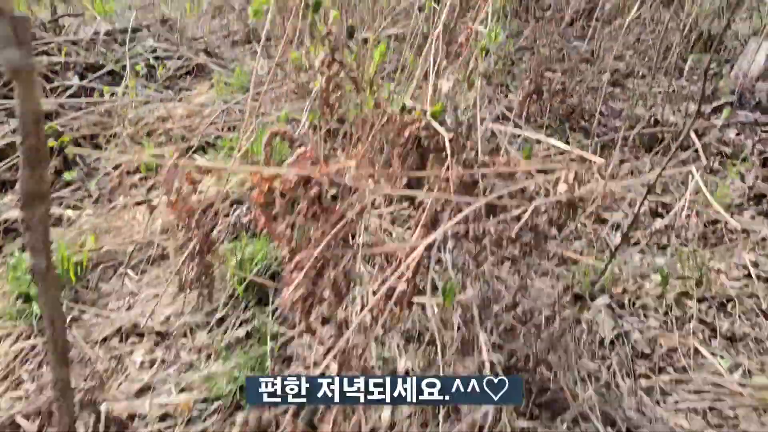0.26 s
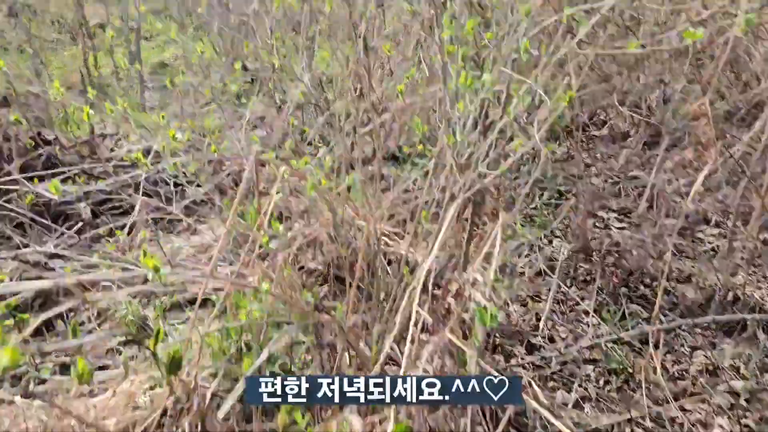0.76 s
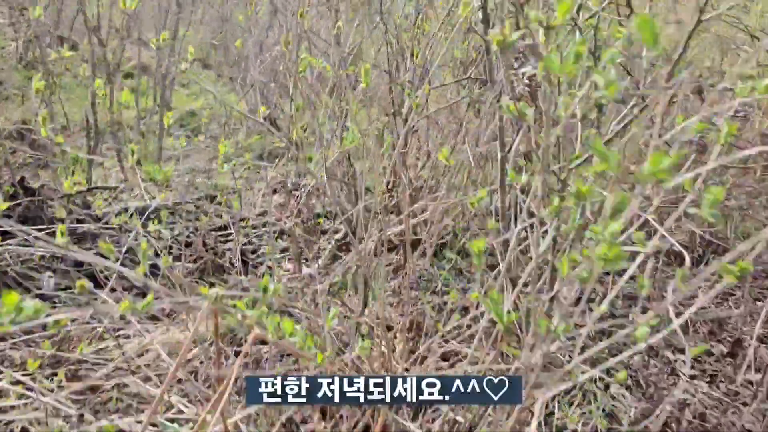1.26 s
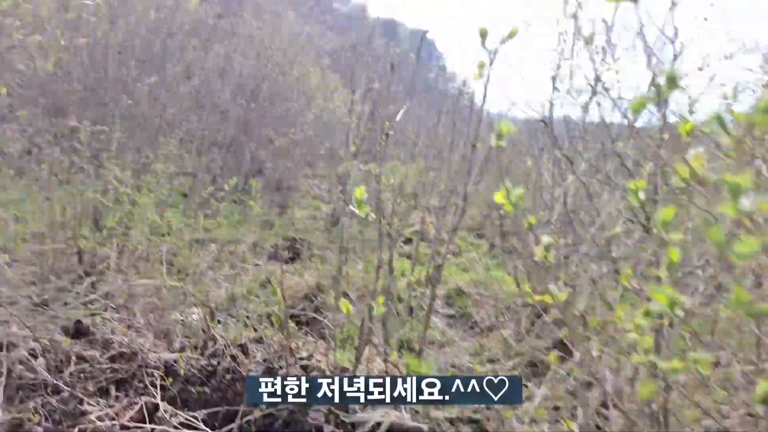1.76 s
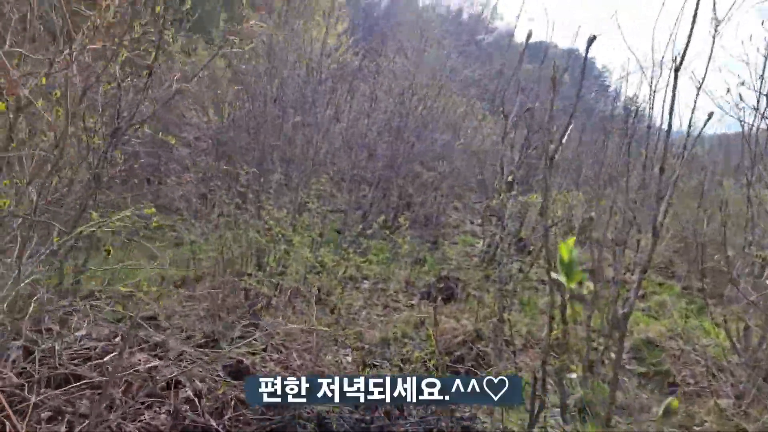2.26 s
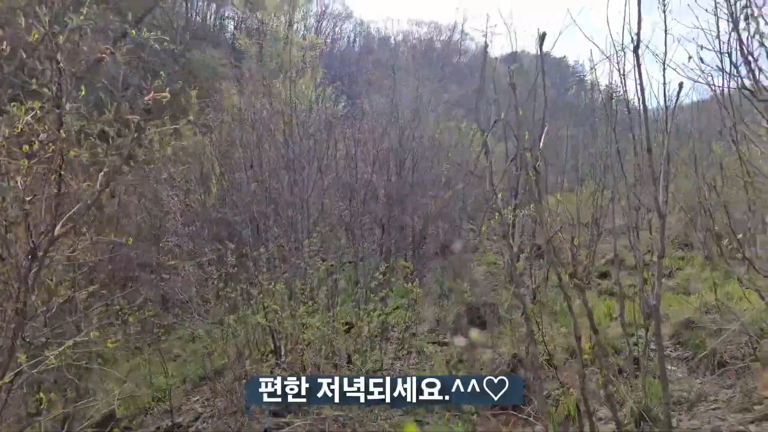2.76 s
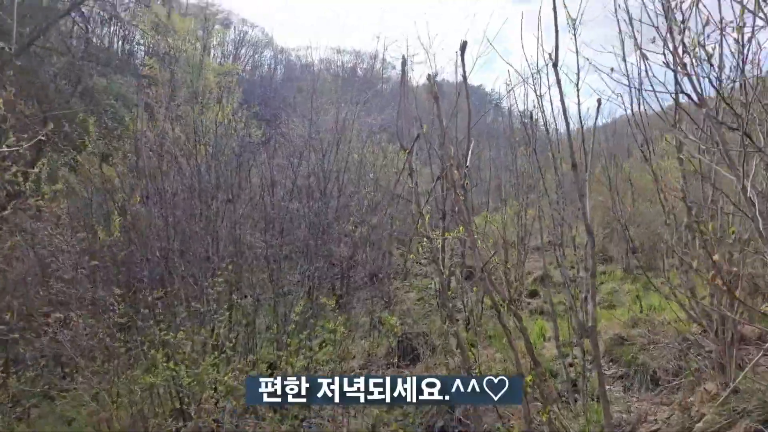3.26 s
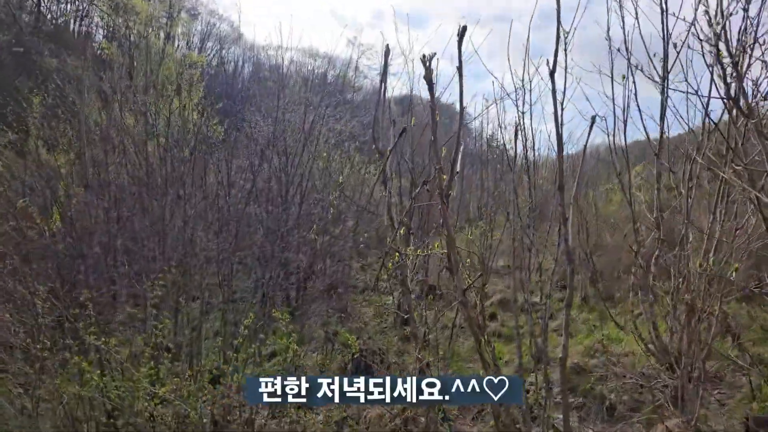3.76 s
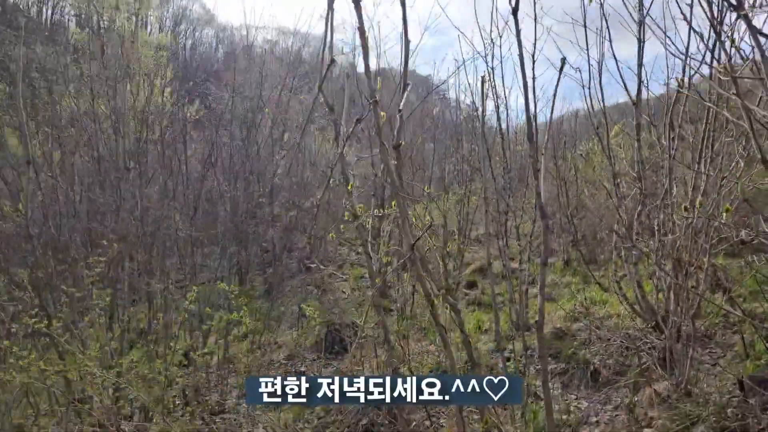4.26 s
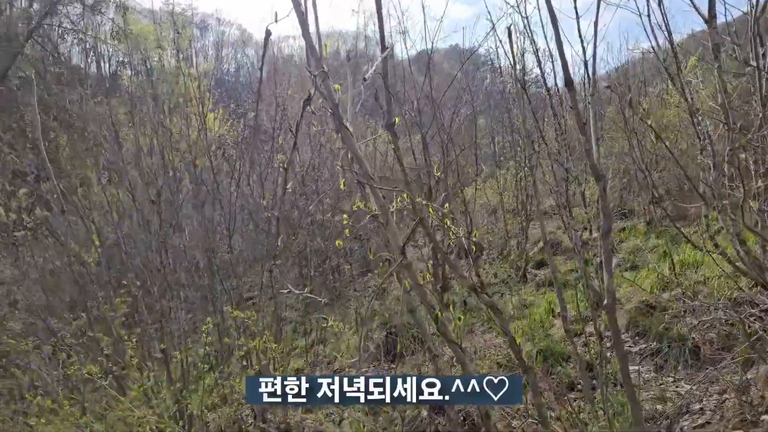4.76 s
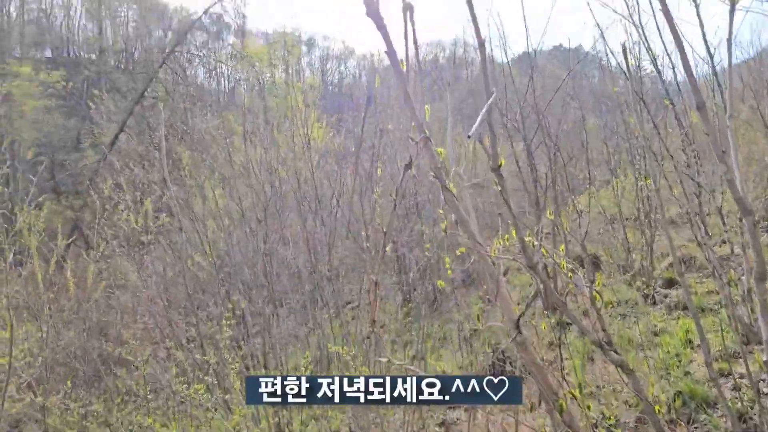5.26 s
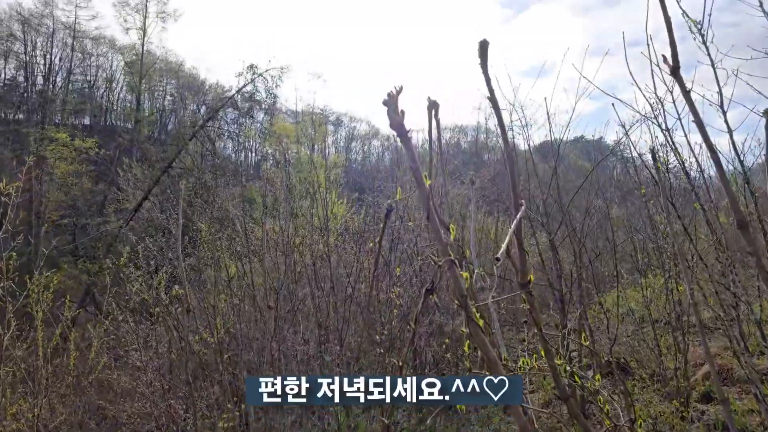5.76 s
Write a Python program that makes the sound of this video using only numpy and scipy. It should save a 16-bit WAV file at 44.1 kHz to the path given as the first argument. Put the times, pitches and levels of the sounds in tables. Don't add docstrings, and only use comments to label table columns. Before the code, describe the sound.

Brittle leaves crackle from the start over faint outdoor hiss and low wind. Twigs crack, stems rasp on cloth, and a branch raps a pole just after two seconds. A small distant bird whistles downward around three, then the loudest brush breaking comes near four and a half. It thins, then crackles again at the end. Close, dry, wide stereo, with no room echo.

```python
import sys
import numpy as np
from scipy import signal
from scipy.fft import rfft, irfft, next_fast_len
from scipy.io import wavfile
from scipy.ndimage import uniform_filter1d

SR = 44100
rng = np.random.default_rng(int(sys.argv[2]) if len(sys.argv) > 2 else 0)


def nominal_scale(level):
    x = np.asarray(level, float) / 20
    return 10 ** x


def pcm_store(signal):
    levels = np.round(np.clip(np.atleast_2d(signal), -1, 1) * 32767)
    wavfile.write(sys.argv[1], SR, levels.astype(np.int16).T)


N = 265041


def evened(x):
    return x / np.sqrt(np.mean(x ** 2) + 1e-20)


def read(points, hz):
    f, value = np.transpose(points)
    return np.interp(np.log(hz + 1), np.log(f + 1), value)


def curves(rows):
    s, *columns = np.transpose(rows)
    return [np.interp(np.arange(N) / SR, s, c) for c in columns]


def colour(x, db_at):
    size = next_fast_len(x.shape[-1] + 512)
    gain = nominal_scale(db_at(np.fft.rfftfreq(size, 1 / SR)))
    return irfft(rfft(x, size) * gain, size)[..., :x.shape[-1]]


def above(hz, edge_hz):
    return -10 * np.log10(1 + (edge_hz / (hz + 1e-3)) ** 4)


def sides(db):
    return nominal_scale(np.array([db / 2, -db / 2]))


def add(mix, s, sound):
    part = mix[:, round(s * SR):][:, :sound.shape[1]]
    part += sound[:, :part.shape[1]]


def crackle(per_s, spread_db, grain_ms, bed, clump_db, clump_ms):
    clump_size = int(clump_ms * SR / 1000)
    clumps = uniform_filter1d(rng.standard_normal(N), clump_size)
    clumps = evened(uniform_filter1d(clumps, clump_size))
    sizes = nominal_scale(spread_db * np.minimum(rng.exponential(1, N), 2.3))
    sizes = sizes * (rng.random(N) < per_s / SR)
    bursts = signal.lfilter([1], [1, -np.exp(-1000 / (grain_ms * SR))], sizes ** 2)
    return evened(np.sqrt(bed + bursts / bursts.mean()) * nominal_scale(clump_db * clumps))


def patchy(x, patchy_db, hz_wide, ms_long):
    z = signal.stft(x, nperseg=256, noverlap=128)[2]
    field = rng.standard_normal(z.shape[1:])
    field = uniform_filter1d(field, int(hz_wide * 256 / SR) + 1, 0)
    field = uniform_filter1d(field, int(ms_long * SR / (128 * 1000)) + 1, 1)
    return signal.istft(z * nominal_scale(patchy_db * evened(field)), nperseg=256, noverlap=128)[1][:, :N]


def strokes(bed_db, start, length, db, rise_s, fade_db):
    power = nominal_scale(bed_db) ** 2
    for s, long, peak_db in zip(start, length, db):
        t = np.arange(0, 2 * max(long, .01), 1 / SR)
        stroke = np.minimum(t / rise_s, 1) * nominal_scale(peak_db + fade_db * (t / long) ** 2)
        add(power[None], s, stroke[None] ** 2)
    return 10 * np.log10(power)


# frequency in Hz, level in dB per Hz.
AIR_COLOUR = [(24, -56), (40, -78), (252, -2), (2970, 18), (6330, 1), (10800, -11), (12200, -4),
              (15300, 10), (16500, -22)]
AIR_DB = -63


def air():
    one, two, three = rng.standard_normal((3, N))
    far = colour(one, lambda hz: read(AIR_COLOUR, hz) + above(1350, hz) + 3 * above(hz, 230) + 7)
    hiss = colour(np.array([two, three]), lambda hz: read(AIR_COLOUR, hz) + 2 * above(hz, 330))
    return nominal_scale(AIR_DB) * evened(far + hiss)


# time of the peak in seconds, level in dB, seconds to fall by 20 dB either side.
GUSTS = [(.13, -62.5, 0.4), (.6, -53, 0.28), (1.1, -55.5, 0.14), (1.22, -57, 0.15), (2.05, -63.5, .21),
         (2.5, -62, 0.03), (2.65, -60.5, 0.2), (2.82, -60.5, 0.14), (3.48, -64, 0.2), (4.48, -55, 0.03),
         (4.65, -49, 0.03), (4.79, -40.5, 0.08), (5.08, -66, 0)]
CALM_DB = -95


def wind():
    t = np.arange(0, N, 64) / SR
    puffs = nominal_scale(CALM_DB) ** 2 + sum(nominal_scale(db - 20 * abs(t - s) / fall_s) ** 2 for s, db, fall_s in GUSTS)
    wind_db = curves(np.c_[t, 10 * np.log10(puffs)])[0]
    rumble = colour(rng.standard_normal((2, N)), lambda hz: 2 * above(hz, 29.5) + 2 * above(102, hz))
    return sides(1.7)[:, None] * nominal_scale(wind_db + 3.5) * evened(rumble)


# time in seconds, effort in dB, coarse leaves and stems over fine ones in dB.
PUSH = [(0, -49, -11), (.3, -48, -9), (.5, -42, -6), (.72, -42, -7.5), (.95, -52.5, -8), (1.6, -45.5, -10),
        (1.72, -37.5, -13), (2.3, -37, -12), (2.43, -38.5, -13.5), (2.93, -43.5, -13), (3.4, -35, -13),
        (3.9, -34.5, -17), (4.27, -40.5, -13), (4.6, -32, -13), (4.9, -37, -12), (5.2, -45, -9.5),
        (5.64, -53.5, -8.5), (6.01, -36.5, -7)]
# start in seconds, length in seconds, level in dB, coarse over fine in dB.
CRUSHES = [(0.103, 0.057, -39, -8.5), (0.267, 0.042, -42.5, 0.5), (0.378, .075, -36, -6.5),
           (0.599, .1, -49, -6), (0.784, 0.079, -42.5, -12.5), (1.051, .1, -40.5, -9.5),
           (1.268, 0.068, -36, -13.5), (1.308, .07, -33.5, -14.5), (1.401, 0.09, -36.5, -8.5),
           (2.199, .045, -37.5, -5), (2.484, 0.11, -30.5, -17), (2.621, 0.21, -37, -9),
           (3.01, 0.069, -36, -18), (3.37, 0.12, -38.5, -4), (4.001, 0.033, -45, -14),
           (4.594, 0.046, -28, -9.5), (4.727, 0.14, -38.5, -3), (4.897, 0.046, -34.5, -8),
           (5.115, 0.056, -48.5, -2), (5.354, 0.14, -45, -7.5), (5.481, 0.045, -42, -7),
           (5.528, 0.061, -38, -4), (5.873, .1, -39, -12)]
CRUSH_RISE_S, CRUSH_FADE_DB = .018, -11.5


def leaf_levels():
    push_db, coarse_db = curves(PUSH)
    s, long, db, over_db = np.transpose(CRUSHES)
    hiss_db = strokes(push_db, s, long, db, CRUSH_RISE_S, CRUSH_FADE_DB)
    scrape_db = strokes(push_db + coarse_db, s, long, db + over_db, CRUSH_RISE_S, CRUSH_FADE_DB)
    return hiss_db, scrape_db


# frequency in Hz, level in dB per Hz.
LEAF_COLOUR = [(410, -35.5), (700, -27.0), (1460, -21.0), (1730, -18.5), (2580, -15.5), (3300, -11),
               (6150, -7.0), (8720, -9.5), (10900, -10.0), (12500, -6.5), (15400, -12.0), (20000, -4)]
# time in seconds, left over right in dB.
SIDE_OF_PATH = [(0.0, -6.5), (0.27, 1), (0.37, -1.5), (1.25, -3), (2.11, 2), (3.43, -0.5), (3.63, 2.5),
                (5.64, -0.5), (6.01, 0)]


def leaves():
    hiss_db, scrape_db = leaf_levels()
    side_db, = curves(SIDE_OF_PATH)
    both = crackle(per_s=900, spread_db=4.6, grain_ms=.35, bed=1.4, clump_db=1.2, clump_ms=14)
    own = crackle(per_s=300, spread_db=3.5, grain_ms=.8, bed=2, clump_db=.8, clump_ms=15)
    coarseness_db = scrape_db - hiss_db + 11
    both = both ** np.clip(1 + .06 * coarseness_db, .5, 1.3)
    one, two, three, four = rng.standard_normal((4, N))
    fine = patchy(both * np.array([one, two]), patchy_db=1.2, hz_wide=1200, ms_long=30)
    pair = np.array([three, 0.17 * three + 0.96 * four])
    coarse = patchy(both * own * pair, patchy_db=1.8, hz_wide=350, ms_long=40)
    fine = evened(colour(fine, lambda hz: read(LEAF_COLOUR, hz) + above(hz, 5500)))
    top = colour(fine, lambda hz: 2 * above(hz, 9500))
    fine = top + nominal_scale(.35 * coarseness_db) * (fine - top)
    coarse = evened(colour(coarse, lambda hz: read(LEAF_COLOUR, hz) + above(3060, hz)))
    return sides(side_db - 0.5) * (nominal_scale(hiss_db + 3.5) * fine + nominal_scale(scrape_db + 4.5) * coarse)


# start in seconds, length in seconds, level in dB.
TREADS = [(0.27, 0.068, -53), (0.372, 0.075, -47), (0.463, 0.57, -49), (0.697, 0.067, -42.5),
          (1.053, 0.06, -49.5), (1.247, 0.21, -54.5), (2.21, 0.2, -62), (2.5, 0.36, -55.5),
          (2.67, 0.1, -51), (3.308, 0.36, -51), (4.421, 0.12, -53.5), (4.563, 0.3, -56),
          (4.732, 0.069, -50), (5.03, 0.18, -57), (5.822, 0.33, -66)]
TREAD_RISE_S, TREAD_FADE_DB = 0.026, -8.5
GROUND_DB, GROUND_FOLLOWS = -60, 0.35
# frequency in Hz, level in dB per Hz.
HAND_COLOUR = [(41, -48), (70, -29), (107, -12), (190, 0), (237, 0), (335, -0.5), (800, -7.5), (1500, -14),
               (1950, -27.5), (3300, -120)]


def crunch():
    ground_db = GROUND_DB + GROUND_FOLLOWS * (curves(PUSH)[0] + 40)
    crunch_db = strokes(ground_db, *np.transpose(TREADS), TREAD_RISE_S, TREAD_FADE_DB)
    one, two = rng.standard_normal((2, N))
    lumps = crackle(per_s=120, spread_db=3, grain_ms=5, bed=.7, clump_db=2.2, clump_ms=25)
    pair = lumps * np.array([one + 0.35 * two, one - 0.22 * two])
    return nominal_scale(crunch_db + 0.5) * evened(colour(pair, lambda hz: read(HAND_COLOUR, hz)))


# start in seconds, peak in dB, thickness as the share under 4 kHz in dB,
# left over right in dB.
SNAPS = [(.0807, -25, -7.5, 4.5), (.1165, -17, -21, 5), (.1486, -20.5, -19, 3), (.174, -22, -11.5, 19),
         (.27, -21, -18, -1), (.417, -11, -15, 0), (.8762, -24.5, -7.5, -3), (1.0664, -27, -18, 15),
         (1.1394, -25, -14, -3.5), (1.2735, -27, -21, -6), (1.4616, -20, -17, -5.5), (1.5098, -25, -4, 1),
         (1.937, -20.5, -18, 15.5), (1.9806, -9, -17, 14.5), (2.0628, -8.5, -19, 8), (2.252, -25, -18, 7.5),
         (2.2956, -17, -18, 2), (2.689, -15.5, -10.5, -1), (2.828, -23, -10, 14), (3.105, -29, -20, 8),
         (3.1842, -30, -20, 12), (3.615, -30, -20, 10), (4.4687, -6, -24, 8), (4.6023, -7, -22.5, 8),
         (4.723, -14, -20, 1), (4.7622, -15.5, -19, 5), (5.2598, -18.5, -16.5, -1),
         (5.3555, -15.5, -24.5, 4), (5.562, -16.5, -17, 1), (5.9441, -18, -22, 8)]
# start in seconds, peak in dB, left over right in dB.
TICKS = [(.0331, -22, 3), (0.4334, -13, 1), (0.5424, -14, 2), (0.5947, -23, -3.5), (.6724, -11, -3.5),
         (.776, -25, -2), (.802, -14, 1), (1.2877, -19.5, -1), (1.4293, -12, 0), (1.6917, -29, 9),
         (2.1021, -22.5, 11), (2.2037, -14, 7), (2.485, -16.5, 10), (2.5076, -12.5, 8), (2.525, -16, 17),
         (2.603, -13, 11), (3.019, -26, 18), (3.861, -16, 7), (3.8693, -16.5, 7.5), (2.2288, -19, 9),
         (2.192, -20, 4.5), (2.8127, -19, 7), (3.129, -25, 7), (3.2388, -24, 7), (3.3525, -21, 6),
         (3.7818, -20.5, 8), (4.2561, -26, 4), (4.4418, -11.5, -0.5), (4.4995, -14, 8), (4.5537, -20, 8),
         (4.5677, -20.5, 12), (4.5835, -28, 10), (4.657, -20.5, 14), (4.9093, -18, 7), (4.9296, -10.5, 6),
         (5.4895, -11, 2.5), (5.851, -20, 0), (5.879, -19, 2), (5.895, -6.5, 9.5), (5.922, -14.5, 3)]
# start in seconds, peak in dB before a common
# lift, left over right in dB.
MORE_TICKS = [(0.387, -27, -0.5), (0.631, -31, -1.0), (0.833, -31, -3), (0.991, -35, 0.0), (1.336, -27, 0),
              (1.4135, -22.5, 0), (1.4518, -29, -2.0), (1.539, -31, -4), (1.5769, -36.5, -1.0),
              (1.7718, -27, -2), (1.9144, -27, 5), (2.26, -31, 2.0), (2.5286, -21.5, 4),
              (2.5654, -28.5, 0.5), (2.9791, -31.5, 2), (3.6686, -27, 6), (3.984, -28.5, 3),
              (4.7096, -20.5, -1), (4.7913, -23.5, 4), (4.8274, -22, 5), (4.8534, -28, 3.0),
              (4.8868, -26, 3), (4.973, -26, 5), (5.033, -34, 4), (5.1696, -34, 3), (5.3177, -41, 3),
              (5.4294, -32, 1), (5.5078, -32, 1.0), (5.5433, -34, 3), (5.6825, -36, 7), (5.7443, -34.5, 3.5),
              (5.7692, -30, 2.0)]
TICK_THICK_DB, MORE_TICKS_LIFT_DB = -30, 5.5
BUILD_S, BUILD_PER_S, CRACK_PER_S, REBOUND, LINGER = .0012, 1900, 1100, .22, .08


def snaps():
    out, t = np.zeros((2, N)), np.arange(1400) / SR
    breaks = SNAPS + [(s, db, TICK_THICK_DB, side_db) for s, db, side_db in TICKS]
    breaks += [(s, db + MORE_TICKS_LIFT_DB, TICK_THICK_DB, side_db) for s, db, side_db in MORE_TICKS]
    noise = rng.standard_normal((len(breaks), 3, len(t)))
    later = rng.uniform(0.0029, 0.0038, (len(breaks), 1))
    for (s, db, thick_db, side_db), (a, b, c), lag in zip(breaks, noise, later):
        shape = np.exp(np.minimum((t - BUILD_S) * BUILD_PER_S, (BUILD_S - t) * CRACK_PER_S))
        rebound = REBOUND * (t > lag) * np.exp((lag - t) * 900)
        shape = shape + rebound + LINGER * (t > BUILD_S) * np.exp(-t * 90)
        thin = colour(shape * np.array([a, b]), lambda hz: read(LEAF_COLOUR, hz) + above(hz, 2000))
        blow = (t >= .0008) * np.exp(-t * 9000) * (1 + .4 * c + .3 * np.array([a, b]))
        thick = colour(blow, lambda hz: above(hz, 420) + above(6000, hz))
        crack = 0.13 * evened(thin) + nominal_scale(thick_db + 6.0) * thick / abs(thick).max()
        add(out, s, sides(side_db - 2.5)[:, None] * nominal_scale(db - 2.5) * crack)
    return out


# start in seconds, peak in dB, left over right in dB, share under 2.5 kHz in dB.
POPS = [(.15, -16, 13, -40), (.1756, -15, 5, -13), (.5444, -16, 9, -25), (.9922, -30, 3, -27),
        (1.1381, -25, -4, -14), (1.5401, -25, -4, -11), (1.5966, -23, 8, -31), (1.6202, -24, -3, -7),
        (1.6514, -24, 13, -30), (1.7735, -24, 3, -14), (1.981, -5, 13, -22), (2.0632, -9, 11, -23),
        (2.2947, -9, 12, -29), (2.5094, -4, 12, -32), (2.5254, -5, 11, -31), (2.5673, -15, 11, -28),
        (3.0655, -13, 19, -30), (3.106, -9.5, 21, -2), (3.1744, -16, 13, -28), (3.1849, -10.5, 20, -21),
        (3.5427, -11, 11, -25), (3.6163, -11.5, 11, -9), (3.9823, -19, 14, -35), (3.9857, -17, 6, -35),
        (4.4693, -8, 16, -11), (4.5009, -9, 14, -26), (4.568, -5, 19, -41), (4.584, -1, 12, -38),
        (4.6067, -7, 7, -30), (5.0346, -14, 21, -37), (5.171, -24, 5, -23), (5.4277, -30, 2, -12),
        (5.5444, -14, 12, -24), (5.8041, -20, 10, -15)]
POP_BODY_DB, POP_BRIGHT_DB, POP_FIZZ_DB = 9, -5.5, -22
POP_RING_HZ, POP_RING_S = 13000, .00022


def pops():
    out, t = np.zeros((2, N)), np.arange(-200, 400) / SR
    impulse = 1. * (t == 0)
    step = colour(impulse, lambda hz: above(9000, hz) + above(hz, 90))
    ping = np.cos(2 * np.pi * POP_RING_HZ * t) * np.exp(-(t / POP_RING_S) ** 2)
    ping = ping + .5 * colour(impulse, lambda hz: above(hz, 5000))
    fizz = colour(rng.standard_normal((len(POPS), 2, len(t))), lambda hz: 2 * above(hz, 4000))
    for (s, db, side_db, low_db), tail in zip(POPS, fizz):
        body = nominal_scale(min(low_db + POP_BODY_DB, 0))
        click = body * step / step.max() + (1 - body) * nominal_scale(POP_BRIGHT_DB) * ping / ping.max()
        pair = -np.array([click, np.roll(click, shift=5)])
        pair = pair + nominal_scale(POP_FIZZ_DB) * tail * (t > 0) * np.exp(-abs(t) * 700)
        gains = sides(side_db - 7 * (1 - body))
        add(out, s + t[0], (gains / gains.max())[:, None] * nominal_scale(db) * pair)
    return out


# start in seconds, peak in dB, centre frequency in Hz, width in Hz, length in seconds.
SCUFFS = [(0.267, -42.5, 3770, 300, 0.011), (0.81, -54, 1200, 90, 0.053), (0.601, -49.5, 1780, 340, 0.13),
          (1.325, -49, 1740, 350, 0.045), (1.405, -53, 1550, 200, 0.053), (2.245, -57, 820, 60, 0.035),
          (2.944, -57.5, 1730, 90, 0.086), (3.377, -56, 1610, 250, 0.057), (4.762, -36, 1360, 200, 0.0098),
          (4.921, -60, 1720, 120, 0.16), (5.087, -58, 1720, 120, 0.13), (5.489, -54, 2250, 100, 0.044),
          (5.535, -46, 2370, 400, 0.043)]


def scuffs():
    out = np.zeros((2, N))
    noises = rng.standard_normal((len(SCUFFS), 8000))
    for (s, db, centre_hz, width, length), noise in zip(SCUFFS, noises):
        band = evened(colour(noise, lambda hz: -20 * np.log10(1 + ((hz - centre_hz) / width) ** 2)))
        stroke = signal.windows.tukey(int(np.clip(length, .005, .17) * SR), .5)
        add(out, s, np.ones((2, 1)) * nominal_scale(db) * band[:len(stroke)] * stroke)
    return out


# frequency in Hz, level in dB, seconds to die by 60 dB.
POLE_MODES = [(826, -1, .21), (1304, -0.5, 0.13), (1730, -2, 0.07), (1980, 2.5, 0.057), (2450, -1.5, 0.057),
              (2837, 1.5, 0.053), (3000, -1.5, .06), (3840, 5, 0.041), (4480, -2, 0.045), (5280, -5, .03)]
# start in seconds, peak in dB, frequency in Hz that the blow favours,
# second such frequency in Hz, left over right in dB.
POLE_HITS = [
    (0.2806, -30, 1300, 2950, 1),
    (.282, -40, 826, 2000, 1),
    (.316, -39.5, 826, 826, 3),
    (2.209, -20, 1880, 3050, 3.5),
    (2.246, -37, 1900, 4400, 0),
    (2.261, -38, 2000, 4400, 1),
    (5.259, -28, 1980, 2290, 2.5),
    (5.562, -31, 2380, 3000, 1),
    (5.802, -35, 2010, 2510, 2.5),
    (5.356, -43, 2000, 3840, 2),
]
BLOW_DB_PER_OCTAVE_SQUARED, BLOW_FLOOR_DB = -80, -24


def pole():
    out, t = np.zeros((2, N)), np.arange(6000) / SR
    hz, mode_db, t60 = np.transpose(POLE_MODES)[:, :, None]
    detune = rng.standard_normal((len(POLE_HITS), len(POLE_MODES), 1))
    rattle = rng.standard_normal((len(POLE_HITS), 2, 600)) * np.exp(-t[:600] * 500)
    for (s, db, first_hz, second_hz, side_db), off, taps in zip(POLE_HITS, detune, rattle):
        octaves = np.minimum(abs(np.log2(hz / first_hz)), abs(np.log2(hz / second_hz)))
        weight = nominal_scale(mode_db) * (nominal_scale(BLOW_DB_PER_OCTAVE_SQUARED * octaves ** 2) + nominal_scale(BLOW_FLOOR_DB))
        decay = nominal_scale(-60 * t / np.maximum(t60, .005))
        ring = (weight * decay * np.sin(2 * np.pi * hz * (1 + .005 * off) * t)).sum(0)
        ring = ring * (0.44 + np.exp(-t * 300))
        ragged = ring + .03 * signal.fftconvolve(taps, ring[None], axes=1)[:, :len(t)]
        add(out, s, sides(side_db)[:, None] * nominal_scale(db - 2.5) * ragged * (1 - np.exp(-t * 2500)))
    return out


# start in seconds, peak in dB, frequency in Hz, length in cycles.
THUDS = [(0.383, -31.5, 237, 1.3), (0.496, -41, 266, 2), (0.568, -37, 467, 3.1), (0.734, -30, 406, 1.4),
         (1.066, -30.5, 414, 1.9), (1.109, -40.5, 160, 1.6), (2.683, -25, 503, 2.1), (2.738, -33, 600, 2.5),
         (3.269, -44.5, 318, 1.7), (3.352, -37, 352, 2), (3.426, -35, 278, 1.6), (3.494, -31, 307, 1.8),
         (3.55, -35, 192, 1.1), (4.483, -34.5, 430, 2.7), (4.7475, -31, 400, 1.5),
         (4.7586, -18.5, 430, 2.04), (4.797, -29.5, 209, 0.65), (5.04, -40.5, 167, 2.2),
         (5.111, -36, 410, 1.6)]


def thuds():
    out, t = np.zeros((2, N)), np.arange(2000) / SR
    grit = colour(rng.standard_normal((len(THUDS), len(t))), lambda hz: read(HAND_COLOUR, hz))
    for (s, db, hz, cycles), tail in zip(THUDS, evened(grit)):
        u = t * hz / max(cycles, .3)
        bump = np.sin(2 * np.pi * hz * t) * (3 * u * np.exp(1 - 3 * u)) ** 2
        crumble = 0.22 * tail * np.exp(-t * 110) * (1 - np.exp(-t * 600))
        add(out, s + 0.00415, np.ones((2, 1)) * nominal_scale(db - 1.0) * (bump + crumble))
    return out


# start in seconds, peak in dB, ring in Hz, left over right in dB, seconds to die by 60 dB.
KNOCKS = [
    (0.4167, -28.5, 1240, -4, 0.019),
    (0.637, -38, 2200, 8, 0.056),
    (1.508, -42.5, 3450, 6, 0.032),
    (1.619, -39, 2770, -7, 0.018),
    (2.287, -44, 930, 0, 0.033),
    (2.829, -34.5, 2220, -17, 0.013),
    (5.894, -33.5, 4060, -6, 0.045),
    (5.951, -37.5, 2520, -3, 0.036),
]
# ratio to the main ring, level in dB.
TWIG_MODES = [(1.0, 5.5), (1.4, -3), (2.9, -14), (0.74, -7), (0.41, -27), (3, -2.5)]


def knocks():
    out, t = np.zeros((2, N)), np.arange(4000) / SR
    scatter = rng.uniform(-1.33, 1, (len(KNOCKS), len(TWIG_MODES)))
    chatter = rng.standard_normal((len(KNOCKS), 2, len(t)))
    chatter = chatter * (rng.random((len(KNOCKS), 1, len(t))) < .03)
    for (s, db, hz, side_db, t60), off, taps in zip(KNOCKS, scatter, chatter):
        ring = np.zeros(len(t))
        for (ratio, mode_db), o in zip(TWIG_MODES, off):
            mode_hz = hz * ratio * (1 + 0.022 * o * (ratio != 1))
            ring += nominal_scale(mode_db - 60 * ratio * t / max(t60, .005)) * np.sin(2 * np.pi * mode_hz * t)
        ring = ring * (.3 + np.exp(-t * 350))
        ragged = ring + 0.11 * signal.fftconvolve(taps * np.exp(-t * 90), ring[None], axes=1)[:, :len(t)]
        add(out, s, sides(side_db)[:, None] * nominal_scale(db + 1.5) * ragged * (1 - np.exp(-t * 1500)))
    return out


# start in seconds, peak in dB, first pitch in Hz, last pitch in Hz, length in seconds.
SQUEAKS = [(.6, -52, 2000, 2240, .045), (.62, -51, 1750, 1520, 0.071), (0.698, -54, 1800, 2000, .045),
           (1.326, -49.5, 1394, 1650, .03), (1.34, -50.5, 1655, 1710, .05), (1.325, -52, 2650, 2340, 0.034),
           (1.405, -52, 1600, 2050, 0.031), (1.425, -52.5, 2150, 1950, .035),
           (4.797, -46.5, 680, 757, .025), (4.77, -48, 1800, 1720, .014), (4.795, -50, 1380, 1330, 0.016),
           (1.735, -50, 2250, 2200, .025), (5.51, -52, 1950, 2050, .08)]
SQUEAK_WIDTH_HZ = 70


def squeaks():
    out = np.zeros((2, N))
    waver = colour(rng.standard_normal((len(SQUEAKS), 2, 5000)), lambda hz: above(SQUEAK_WIDTH_HZ, hz))
    for (s, db, start_hz, end_hz, length), (a, b) in zip(SQUEAKS, evened(waver)):
        size = int(np.clip(length, .005, .1) * SR)
        turn = np.exp(2j * np.pi * np.cumsum(np.linspace(start_hz, end_hz, size)) / SR)
        tone = ((0.84 + a + 1j * b)[:size] * turn).real
        add(out, s, np.ones((2, 1)) * nominal_scale(db) * tone * signal.windows.tukey(size, .6))
    return out


# time in seconds, pitch in Hz, level in dB.
CHIRPS = [
    [(2.905, 5480, -62.5), (2.916, 5420, -49), (2.927, 5330, -69)],
    [(2.942, 5620, -57), (2.955, 5010, -52.5), (2.966, 4770, -55)],
    [(3.043, 6270, -49), (3.058, 5874, -51), (3.075, 5330, -48.5), (3.11, 4930, -46), (3.143, 4266, -46)],
]


def bird():
    out = np.zeros((2, N))
    for rows in CHIRPS:
        s, hz, db = np.transpose(rows)
        t = np.arange(s[0], s[-1], 1 / SR)
        flutter = 1 + 0.33 * evened(uniform_filter1d(rng.standard_normal(len(t)), 60))
        whistle = np.sin(2 * np.pi * np.cumsum(np.interp(t, s, hz)) / SR)
        tone = nominal_scale(np.interp(t, s, db) + 7.5) * flutter * whistle
        tone = tone * signal.windows.tukey(len(t), .15)
        for late, echo_db, side_db in [(0, 0, 1), (.011, -16, -3), (.023, -19, 3)]:
            add(out, s[0] + late, sides(side_db)[:, None] * nominal_scale(echo_db) * tone)
    return out


def scene():
    wood = colour(snaps() + pole() + knocks(), lambda hz: 2 * above(hz, 124))
    brush = leaves() + crunch() + wood + pops() + scuffs() + thuds() + squeaks()
    return air() + wind() + brush + bird()


# frequency in Hz, gain in dB.
MIC = [(10900, 0), (11700, 3), (15400, 3), (15800, -38), (16700, -50)]
# frequency in Hz, left port over right in dB.
PORTS = [(60, 2.5), (120, 5.5), (240, -1), (480, 0.5), (950, -0.5), (1890, 1), (3770, 1.5), (7520, -2),
         (15000, 10.5)]


def microphones(dry):
    ports = colour(dry, lambda hz: read(MIC, hz) + np.outer([.5, -.5], read(PORTS, hz)))
    return 0.91 * np.tanh(ports / 0.88)


def low_pass(x):
    return signal.sosfilt(signal.butter(12, 16650, fs=SR, output="sos"), x)


def record(dry):
    return low_pass(microphones(dry))


dry = scene()
out = record(dry)
pcm_store(out)
```